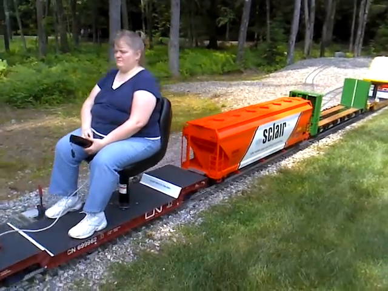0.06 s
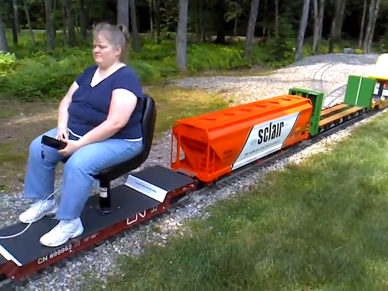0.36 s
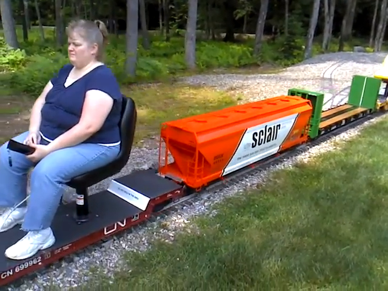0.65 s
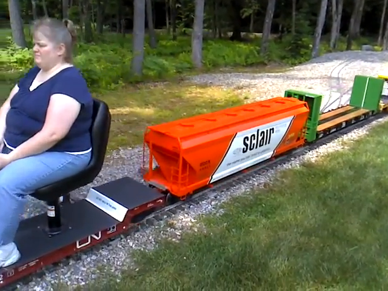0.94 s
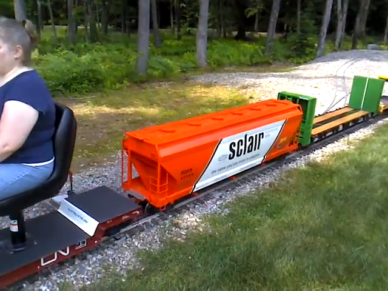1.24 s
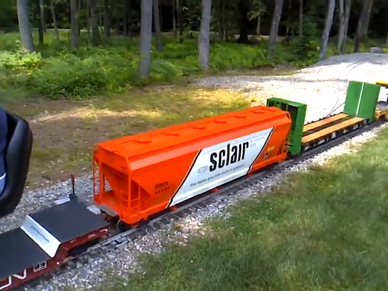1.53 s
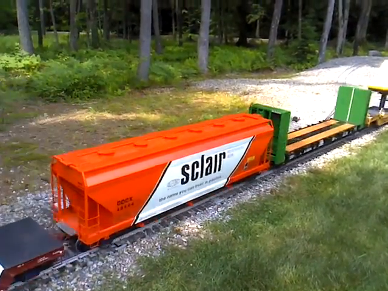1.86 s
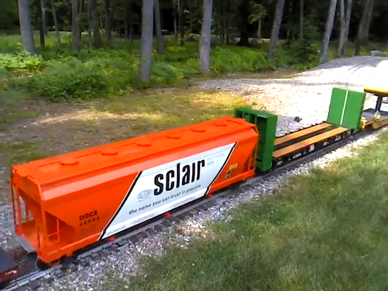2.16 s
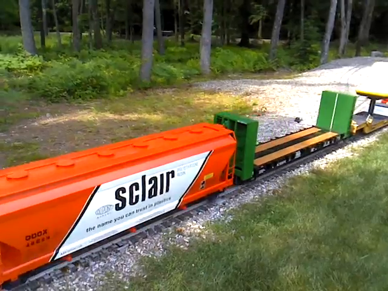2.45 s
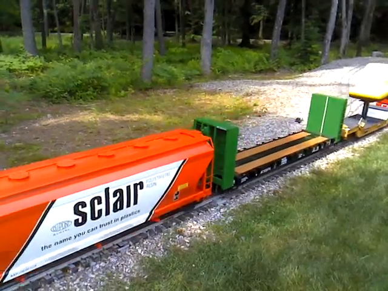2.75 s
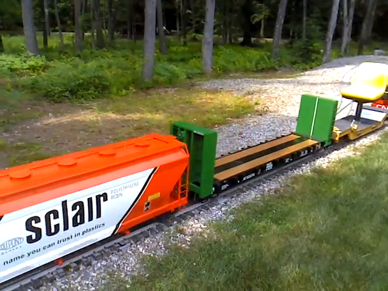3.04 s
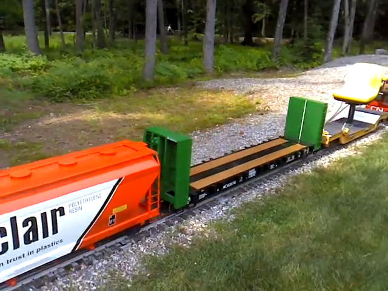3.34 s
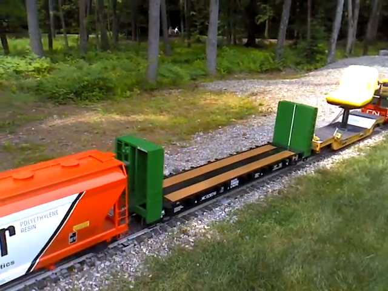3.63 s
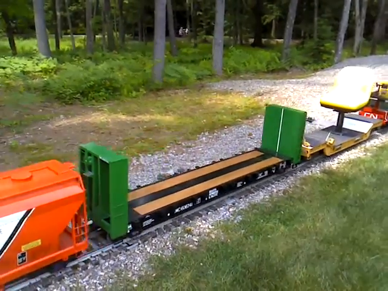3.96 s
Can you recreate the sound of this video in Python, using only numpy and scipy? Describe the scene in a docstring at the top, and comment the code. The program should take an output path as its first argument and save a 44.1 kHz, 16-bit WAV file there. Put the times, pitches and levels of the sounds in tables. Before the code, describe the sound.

A small ride-on train passes outdoors, its throbbing locomotive fading while the wheels rumble and click.

```python
"""Outdoors, a stereo microphone beside gravel-bedded track; a miniature ride-on train rolls slowly past.
At first the locomotive, already off to the left, throbs eight times a second and its gears whine.
After a second it draws away, leaving the cars: wheels roar and crush grit, steel clicks, bodies clunk.
A coupler strikes twice at 1.6 s; from 2.5 s loose parts rattle twice and a wheel squeaks faintly.
A high hiss, heard at the start and again midway, swells a third time near the end."""
import sys
import numpy as np
from scipy import signal
from scipy.fft import rfft, irfft, next_fast_len
from scipy.io import wavfile
from scipy.ndimage import uniform_filter1d, map_coordinates

SR = 44100
rng = np.random.default_rng(int(sys.argv[2]) if len(sys.argv) > 2 else 0)


def master_out(mix):
    """Clip the mix to full scale and print it as 16-bit PCM to the path in sys.argv[1]."""
    frames = np.transpose(np.atleast_2d(mix))
    ceiling = np.clip(frames, -1, 1)
    pcm = np.round(ceiling * 32767).astype(np.int16)
    wavfile.write(sys.argv[1], SR, pcm)


N = 176400
T = np.arange(N) / SR


def amp(db):
    return 10 ** (np.asarray(db) / 20)


def unit(x):
    return x / np.sqrt(np.mean(x ** 2) + 1e-20)


def along(points, hz):
    """Read (freq_hz, value) points on a log frequency axis."""
    freqs, values = np.transpose(points)
    return np.interp(np.log(hz + 1), np.log(freqs + 1), values)


def curve(rows):
    """Join (time_s, value) rows, one value per sample."""
    return np.interp(T, *np.transpose(rows))


def wobble(rate_hz):
    """A smooth random curve with rate_hz knots a second."""
    knots = rng.standard_normal(int(N * rate_hz / SR) + 4)
    return map_coordinates(knots, [T[::50] * rate_hz]).repeat(50)[:N]


def pan(db):
    """Left and right gains with mean 1; the left is db louder."""
    gains = amp(np.array([np.atleast_1d(db), -np.atleast_1d(db)]) / 2)
    return gains / gains.mean(0)


def filtered(x, response):
    """Pass x through a complex frequency response."""
    n = x.shape[-1]
    padded = next_fast_len(n + 4096)
    return irfft(rfft(x, padded) * response(np.fft.rfftfreq(padded, 1 / SR)), padded)[..., :n]


def resonances(modes, f):
    """Response of a body with (pitch_hz, width_hz, gain_db) modes."""
    return sum((-1) ** k * amp(db) * 1j * f * width / (hz * hz - f * f + 1j * f * width)
               for k, (hz, width, db) in enumerate(modes))


def add(out, start_s, x):
    i = max(round(start_s * SR), 0)
    out[:, i:i + x.shape[1]] += x[:, :N - i]


# Likeness of left and right: freq_hz, correlation
STEREO_LIKENESS = [(50, 0.099), (200, 0.99), (600, 0.49), (1200, 0.86), (2200, 0.43), (4000, -0.33),
                   (12000, 0.099)]

def stereo_noise(response, source=None):
    """Colour two unrelated noises and mix them to left and right, at rms 1."""
    def mid_side(hz):
        angle = np.arccos(np.clip(along(STEREO_LIKENESS, hz), -1, 1)) / 2
        return response(hz) * np.array([np.cos(angle), np.sin(angle)])
    if source is None:
        source = rng.standard_normal((2, N))
    mid, side = filtered(source, mid_side)
    return unit(np.array([mid + side, mid - side]))


def rush(spectrum, patchy_db):
    """Stereo noise whose gain varies in patches of time and frequency."""
    cells = signal.stft(rng.standard_normal((2, N)), nperseg=512)[2]
    patches = uniform_filter1d(rng.standard_normal(cells.shape[1:]), size=6, axis=0)
    patches = uniform_filter1d(patches, size=9, axis=1)
    patchy = signal.istft(cells * amp(patchy_db * unit(patches)), nperseg=512)[1][:, :N]
    return stereo_noise(lambda hz: amp(along(spectrum, hz)), patchy)


def blow(modes, rise_s=.001, t60_s=.024):
    """A short rough contact rings a body; its loudest moment has rms near 1."""
    t = T[:SR // 4]
    envelope = np.minimum(t / rise_s, 1) * amp(-60 * np.maximum(t - rise_s, 0) / t60_s)
    contact = envelope * rng.standard_normal((2, len(t)))
    return stereo_noise(lambda f: resonances(modes, f), contact) * np.sqrt(np.mean(envelope ** 2))


# The woods, far from the microphone: freq_hz, gain_db
WOODS_SPECTRUM = [(2000, -73), (4500, 18.5), (6200, -2), (8000, 11), (11500, 10), (13800, -18)]

def woods():
    """A faint, steady, far hiss behind everything."""
    return amp(-63) * stereo_noise(lambda hz: amp(along(WOODS_SPECTRUM, hz)) * np.minimum(hz / 2000, 1))


HISS_SWELLS = [(.02, -42.5), (1.72, -42.5), (3.41, -44.5)]  # swells of high hiss: start_s, level_db
HISS_SPECTRUM = [(2000, -84), (4500, -2.5), (5900, -8), (7000, -2.5), (8000, 7.5), (9300, 0), (10600, 2.5),
                 (11600, -1.5), (12600, 2), (13700, -21)]  # their colour: freq_hz, gain_db
WHEEL_SCRAPES = [(0.964, 0.17, -43.5), (1.282, 0.5, -50.5), (3.047, 0.042, -44.5)]  # wheels rubbing the rail: start_s, length_s, level_db
SCRAPE_SPECTRUM = [(2500, -27), (4200, 10.5), (6200, 10), (8100, 12), (9800, 2), (12000, 12.5),
                   (13600, -29)]  # their colour: freq_hz, gain_db

def hiss_and_scrapes():
    """A flickering hiss swells and sinks; now and then a wheel scrapes the rail, and once it squeaks."""
    rise_s, hold_s, fall_s = .13, .16, .32
    corners = np.cumsum([0, rise_s, hold_s, fall_s])
    swells = sum(amp(db) * np.interp(T - start, corners, [0, 1, 1, 0]) for start, db in HISS_SWELLS)
    scrapes = sum(amp(db) * np.interp((T - start) / length, [0, .25, 1], [0, 1, 0])
                  for start, length, db in WHEEL_SCRAPES)
    hiss = rush(HISS_SPECTRUM, patchy_db=.8)
    rubbing = rush(SCRAPE_SPECTRUM, patchy_db=2)
    thin_band = stereo_noise(lambda f: resonances([(12700, 250, 0)], f) ** 2)
    squeak = amp(-55) * np.exp(-((T - 3.075) / .038) ** 2) * thin_band
    return swells * amp(1.05 * wobble(83)) * hiss + scrapes * rubbing + squeak


RATTLE_RUNS = [(2.541, .08, -37), (3.197, .1, -37)]  # loose parts on the passing cars: start_s, length_s, level_db
CLANK_MODES = [(990, 68, 4.5), (1395, 65, 0), (1526, 71, 6.5), (1750, 67, 7)]  # the cars' clank, in rattles and clunks: pitch_hz, width_hz, gain_db

def rattles(gap_s=.021):
    """Loose parts of the cars chatter in short uneven runs."""
    out = np.zeros((2, N))
    for start, length, db in RATTLE_RUNS:
        for beat_s in np.arange(start, start + length, gap_s):
            late_s = rng.uniform(0, gap_s / 2)
            force_db = rng.normal(0, 3.1)
            ring_hz = rng.uniform(1200, 2500)
            add(out, beat_s + late_s, amp(db + force_db) * blow(CLANK_MODES + [(ring_hz, 520, 0)]))
    return out


CAR_CLUNKS = [(0.152, -42, -36.5, 0.04, 1460), (0.906, -33, -30, 0.038, 1370),
              (0.911, -39, -34, 0.076, 1560), (1.05, -34, -39.5, 0.044, 1940),
              (1.254, -55, -34.5, 0.088, 1560), (1.342, -37, -36, 0.04, 1960),
              (1.905, -33.5, -54, 0.29, 880), (2.17, -22, -39, 0.059, 840), (2.289, -30, -38, 0.16, 1870),
              (3.579, -36, -37, 0.037, 2050), (3.635, -55, -40.5, 0.033, 1950),
              (3.69, -29, -41, 0.022, 2400), (3.829, -32, -41, 0.019, 1800), (3.954, -30.5, -40, 0.17, 850)]  # car bodies going by: start_s, thud_db, clank_db, t60_s, ring_hz
THUD_MODES = [(482, 130, 7), (581, 127, 11), (693, 23, 4), (814, 50, 4)]  # their low resonances: pitch_hz, width_hz, gain_db

def clunks(rise_s=.0077):
    """A car body knocks: a dull thud to the left, a clank with a ring of its own straight ahead."""
    out = np.zeros((2, N))
    for start, thud_db, clank_db, t60_s, ring_hz in CAR_CLUNKS:
        ring = amp(4.5) * blow([(ring_hz, 170, 0)], rise_s, t60_s)
        thud = blow(THUD_MODES, rise_s, t60_s)
        clank = (blow(CLANK_MODES, rise_s, t60_s) + ring) / np.sqrt(2)
        add(out, start, amp(thud_db) * pan(db=11) * thud + amp(clank_db) * pan(db=-.5) * clank)
    return out


COUPLER_STRIKES = [(1.585, -27.5), (1.603, -31.5)]  # a coupler between the cars: start_s, level_db
COUPLER_MODES = [(5460, -5), (9280, 0)]  # its ringing tones: pitch_hz, gain_db

def coupler(rise_s=.001, t60_s=.075):
    """A coupler strikes twice and rings briefly with two rough tones."""
    out = np.zeros((2, N))
    t = T[:SR // 4]
    envelope = np.minimum(t / rise_s, 1) * amp(-60 * t / t60_s)
    for start, db in COUPLER_STRIKES:
        for hz, gain_db in COUPLER_MODES:
            phase = 2 * np.pi * (hz * t + .5 * rng.random((2, 1)))
            roughness = 1.3 * wobble(300)[:len(t)]
            add(out, start, amp(db + gain_db) * envelope * np.sin(phase + roughness))
    return out


STEEL_CLICKS = [(0.5382, -28, 5370), (0.816, -25.5, 9100), (0.906, -31.5, 8100), (0.969, -31.5, 8450),
                (1.478, -34, 5300), (1.584, -22, 9000), (1.603, -29, 12400), (1.61, -35, 9200),
                (1.8235, -24.5, 12200), (2.183, -29.5, 8800), (2.435, -26.5, 11600), (2.546, -34, 1950),
                (2.622, -35.5, 5050), (2.705, -25.5, 2870), (2.954, -31, 5400), (3.23, -43, 1730),
                (3.2436, -34, 2500), (3.33, -32.5, 4170), (3.692, -36, 1290), (3.885, -33.5, 7760),
                (3.911, -30, 4300), (3.951, -34, 11300)]  # contacts at wheels and couplers: start_s, gain_db, ring_hz
STEEL_MODES = [(2900, 70, 13), (4190, 230, 2), (5300, 770, 3), (7800, 420, 7.5), (9020, 750, 5),
               (11300, 230, 7), (12560, 800, 2.5)]  # resonances they share: pitch_hz, width_hz, gain_db

def clicks():
    """Steel taps steel; each click favours a ring of its own."""
    out = np.zeros((2, N))
    for start, db, ring_hz in STEEL_CLICKS:
        ring = amp(-4) * blow([(ring_hz, 520, 0)])
        add(out, start, amp(db - 2.5) * (blow(STEEL_MODES) + ring))
    return out


ROLL_LEVEL = [(0, -31), (.7, -34.5), (1.05, -32.5), (1.5, -34), (2.05, -34.5), (3.2, -35), (3.4, -37),
              (4, -35.5)]  # wheels passing the microphone: time_s, gain_db
ROLL_BALANCE = [(30, -20), (100, 35), (300, 9), (1000, 8), (1600, -0.5)]  # where their sound sits: freq_hz, left_minus_right_db
ROLL_SPECTRUM = [(25, -48), (60, -27.5), (100, -18.5), (200, 2), (290, 4), (380, 0), (540, 3), (680, -6),
                 (850, -6), (1050, -14.5), (1300, -8.5), (1900, -14.5), (2500, -14.5), (3400, -32.5),
                 (4700, -19.5), (5900, -32.5), (8000, -22.5), (11000, -31), (13500, -31)]
GRIT_SPECTRUM = [(300, -10), (900, -8), (2500, 4), (3500, -30), (5000, -9), (8000, -12.5), (13000, -18)]

def wheels(specks_per_s=130, speck_decay_s=.0012):
    """Wheels roar on the rails and crush specks of grit."""
    level_db = curve(ROLL_LEVEL)
    roar = filtered(rush(ROLL_SPECTRUM, patchy_db=1), lambda hz: pan(along(ROLL_BALANCE, hz)))
    crushed = rng.random(N) < specks_per_s / SR
    specks = crushed * amp(5 * np.minimum(rng.exponential(size=N), 3))
    bursts = signal.fftconvolve(specks, np.exp(-T[:SR // 20] / speck_decay_s))[:N]
    grit = stereo_noise(lambda hz: amp(along(GRIT_SPECTRUM, hz)), bursts * rng.standard_normal((2, N)))
    roar_db = level_db - 1.18 + wobble(24.83)
    grit_db = level_db - level_db.mean() - 52
    return amp(roar_db) * roar + amp(grit_db) * grit


GEAR_LINES = [(516, 7.4, 1.5), (732, 15, 1.5), (868.6, 13.4, 5.5), (1066, 44, -6), (1564, 18, -4.5),
              (2333, 23, -8.5)]  # the locomotive's gear whine: pitch_hz, half_width_hz, gain_db
GEAR_LEVEL = [(0, -39.5), (.7, -39), (1.4, -45.5), (2.5, -49), (4, -48)]  # its fade with distance: time_s, level_db

def gears():
    """Gears whine in narrow bands of noise, off to the left, fading as the locomotive leaves."""
    def lines(f):
        return sum(amp(db) * np.abs(resonances([(hz, 2 * half_width, 0)], f)) ** 2
                   for hz, half_width, db in GEAR_LINES)
    return pan(db=7) * amp(curve(GEAR_LEVEL)) * stereo_noise(lines)


DRIVE_LEVEL = [(0, -25), (1.05, -24), (1.5, -35), (2.1, -31), (2.7, -34), (3.25, -32.5), (4, -40.5)]  # the drive, drawing away left of the microphone: time_s, gain_db
DRIVE_SPECTRUM = [(70, -45), (110, -16), (160, -11), (195, -4), (222, 3), (250, 7.5), (275, -4.5),
                  (330, -19), (520, -34), (700, -79)]  # its rumble: freq_hz, gain_db
HUM_LEVEL = [(0, -45), (1, -43), (2, -50), (4, -55)]  # its low throbbing hum: time_s, level_db

def locomotive(turns_per_s=7.99, drone_hz=222.8, hum_hz=127.9, beat_hz=7.93):
    """The drive repeats its rumble every turn around a drone; below, two close tones beat into a throb."""
    level_db = curve(DRIVE_LEVEL)
    rumble = np.zeros(N)
    for harmonic in range(10, 80):
        hz = harmonic * turns_per_s
        phase = 2 * np.pi * (hz * T + rng.random()) + .81 * wobble(2.72)
        rumble += amp(along(DRIVE_SPECTRUM, hz)) * np.sin(phase)
    drone_db = -31 + 6.3 * (level_db - level_db.max())  # fades faster than the rumble
    drone = amp(drone_db) * unit(np.sin(2 * np.pi * drone_hz * T + .5 * wobble(11.04)))
    drive = amp(level_db - 5) * unit(rumble) + drone
    lower_phase = 2 * np.pi * hum_hz * T + .33 * wobble(6.2)
    upper_phase = lower_phase + 2 * np.pi * beat_hz * (T - .115)  # first dip at 0.115 s
    hum = amp(curve(HUM_LEVEL)) * unit(np.sin(lower_phase) - amp(-3) * np.sin(upper_phase))
    stereo = pan(db=11) * drive + pan(db=12) * hum
    right_lead_rad = 1.76
    return np.real(signal.hilbert(stereo) * np.exp(.5j * right_lead_rad * np.array([[-1], [1]])))


def scene():
    """The whole train from the trackside, with the woods behind."""
    return (locomotive() + gears() + wheels() + hiss_and_scrapes()
            + clicks() + clunks() + coupler() + woods() + rattles())


def record(dry, top_hz=13900):
    """The camera keeps nothing above its band limit."""
    return filtered(dry, lambda hz: hz < top_hz)


dry = scene()
out = record(dry)
master_out(out)
```